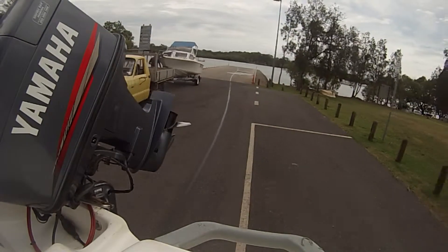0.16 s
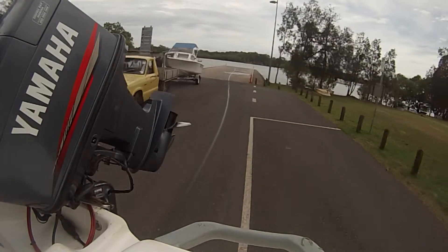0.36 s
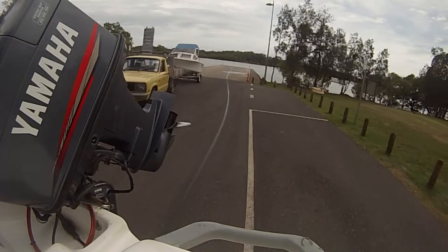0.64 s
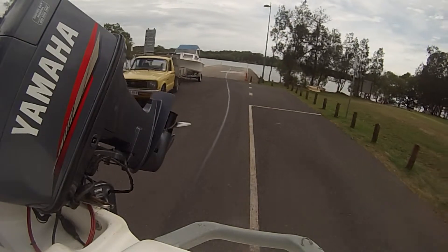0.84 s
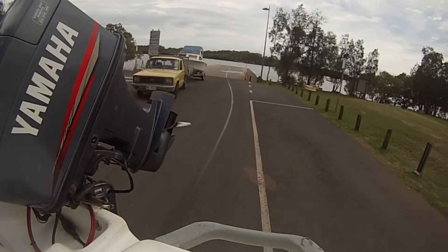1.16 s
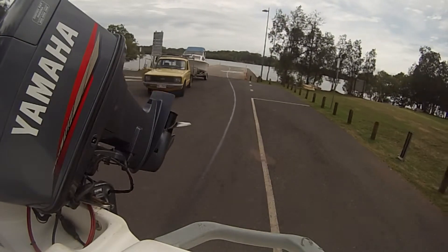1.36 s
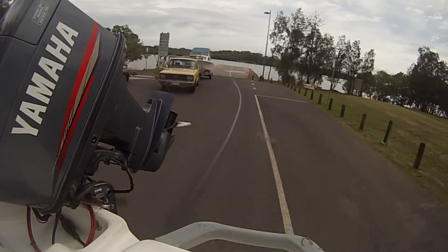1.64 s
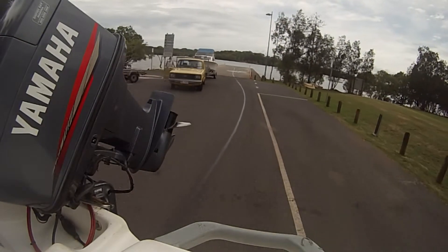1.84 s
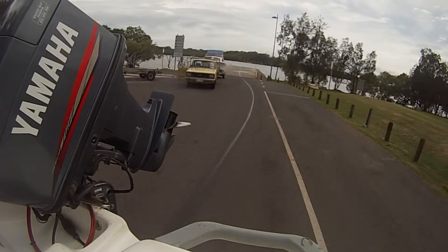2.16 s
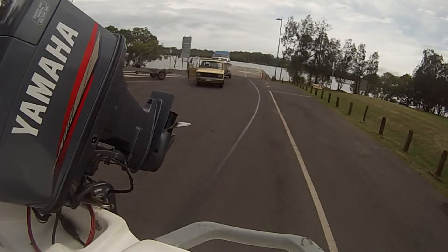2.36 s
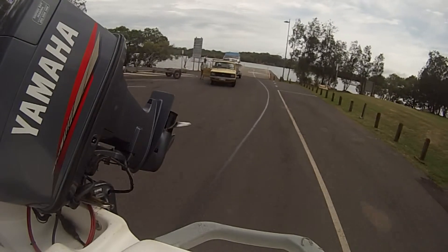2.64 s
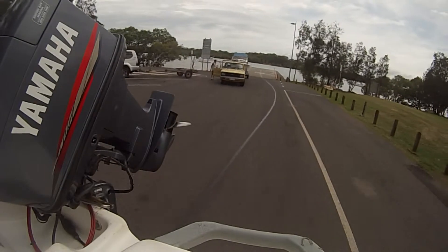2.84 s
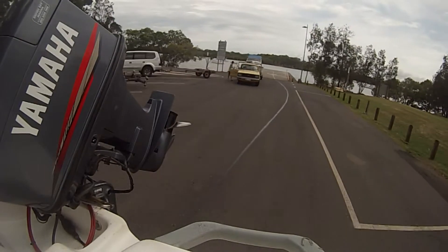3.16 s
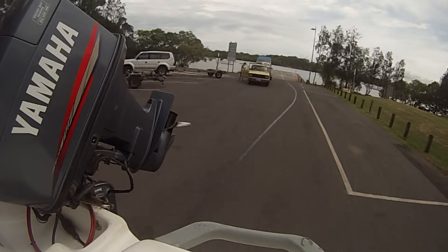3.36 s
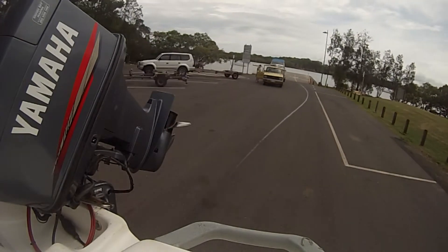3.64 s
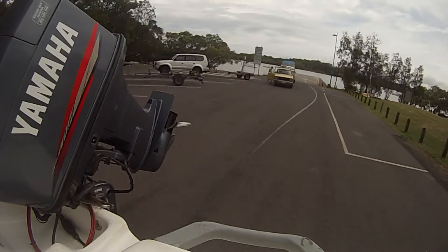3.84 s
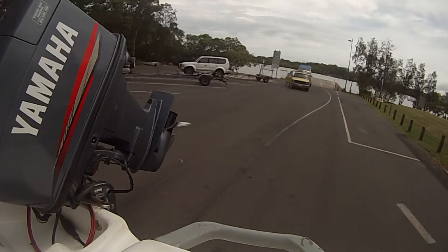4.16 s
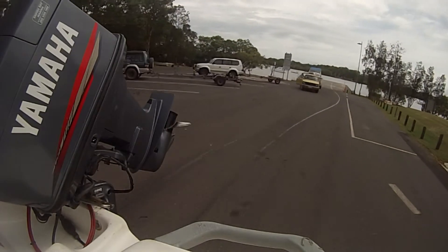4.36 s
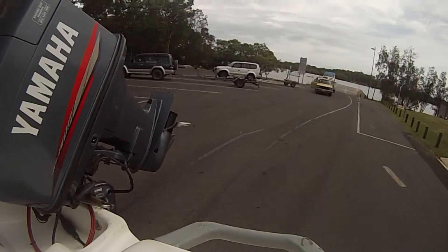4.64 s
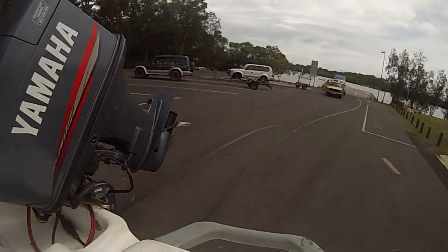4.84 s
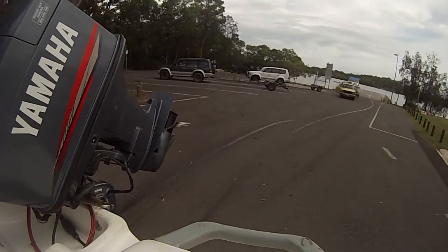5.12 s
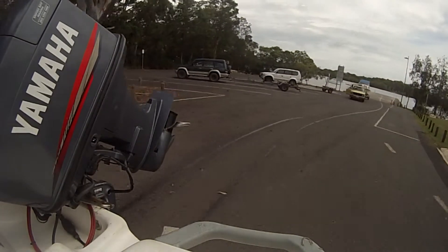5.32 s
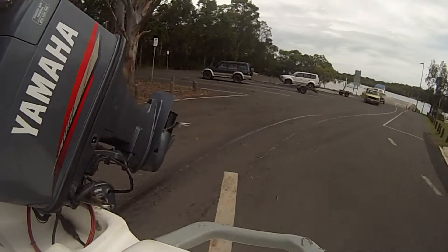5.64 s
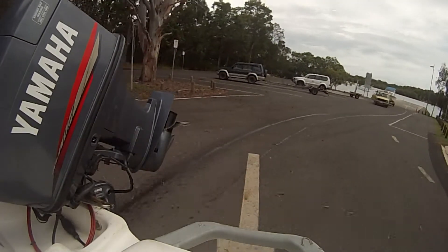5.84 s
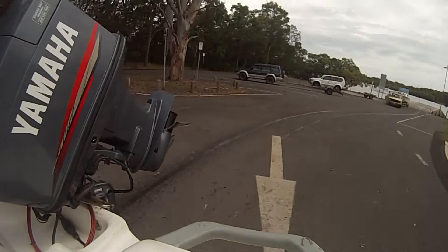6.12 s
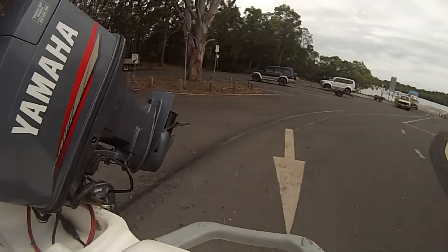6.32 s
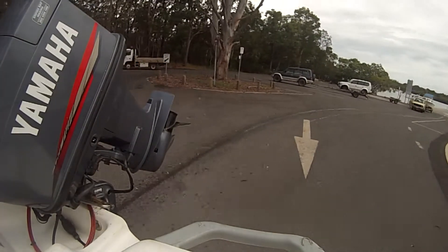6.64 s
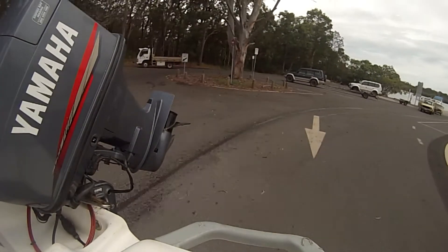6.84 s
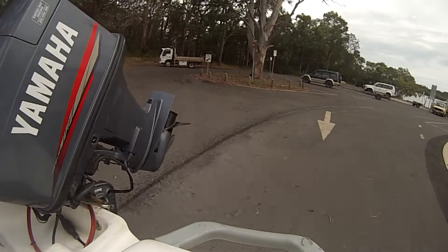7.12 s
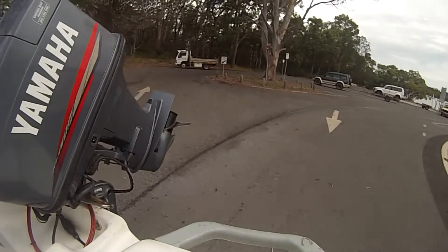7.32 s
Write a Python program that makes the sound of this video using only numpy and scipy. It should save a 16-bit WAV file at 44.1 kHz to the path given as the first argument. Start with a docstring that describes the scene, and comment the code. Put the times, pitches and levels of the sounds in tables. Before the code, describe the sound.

A trailer carries a boat along a paved road, the microphone close to the hull at the back. A low drone swells into soft booms above steady rumble and light tyre hiss. Scattered knocks and hollow bumps join in, along with barely audible birds. The ride gets rougher in the second half, with rattling panels, short stony crunches and deep thuds from the springs.

```python
"""On an asphalt road, at the stern of a boat that rides on its trailer.
The tyres force the hull into vibration: it drones at one low resonance, swells into booms and rattles
in its panels. On coarser pavement the rumble grows, stones crunch through the frame, the springs
thud and a loose fitting knocks. Faint birds chirp in the trees over an even hiss of air and tyres."""
import sys
import numpy as np
from scipy import signal
from scipy.fft import rfft, irfft
from scipy.io import wavfile
from scipy.ndimage import uniform_filter1d

SR = 44100
rng = np.random.default_rng(int(sys.argv[2]) if len(sys.argv) > 2 else 0)


def dump(signal):
    """Clip the signal to [-1, 1] and save it as 16-bit WAV at the path in sys.argv[1]."""
    limited = np.clip(np.atleast_2d(signal).T, -1, 1)
    pcm = np.round(limited * 32767).astype(np.int16)
    wavfile.write(sys.argv[1], SR, pcm)


N = 329868
TIME = np.arange(N) / SR
BINS = np.fft.rfftfreq(N, 1 / SR)

# Hiss of air and tyres. Each row: frequency in Hz, relative spectral density in dB.
HISS_SPECTRUM = [(150, 8), (400, 7), (650, 4), (950, 0), (1500, -1.5), (2100, -4), (4200, -9),
                 (7000, -14.5), (10000, -19.5), (13000, -23), (15500, -26)]
# Bird calls. Each row: start in seconds, length in seconds, first and last pitch in Hz,
# relative level in dB, rms pitch jitter in Hz.
BIRD_CALLS = [(2.918, .1, 5700, 6300, -79, 70), (3.447, 0.14, 4080, 4140, -76, 80),
              (3.486, .08, 3310, 4050, -72, 40), (3.70, 0.1, 6100, 6700, -77.5, 55),
              (3.702, 0.18, 5050, 5200, -80, 110), (3.79, 0.05, 3630, 3680, -75.5, 110),
              (4.115, 0.1, 6400, 6450, -76.5, 65), (4.964, .14, 5100, 6620, -75.5, 65),
              (5.485, 0.09, 5300, 6160, -78, 80), (5.584, 0.054, 3520, 3480, -75, 60),
              (6.26, 0.16, 4850, 5030, -81, 130), (6.308, 0.12, 4250, 4400, -74, 85),
              (6.52, 0.13, 4850, 4940, -75.5, 80), (6.517, 0.13, 3600, 4130, -73.5, 60),
              (6.97, .1, 3740, 4000, -77, 100), (7.085, 0.17, 4800, 5100, -81.5, 140)]
# Coarseness of the asphalt. Each row: time in seconds, relative level of shaking in dB.
ROAD_COARSENESS = [(0, -40.5), (1.0, -42), (2.8, -38), (3.7, -35), (5.1, -32.5), (5.75, -29.5), (7.15, -29),
                   (7.48, -35.5)]
# Rough patches. Each row: start in seconds, length in seconds, change of rumble and of rattle in dB.
ROUGH_PATCHES = [(3.792, 0.43, 2.5, 4.5), (4.587, 0.44, 0.5, 3), (5.507, 0.26, -2, 1.5),
                 (5.907, 0.24, 5, 8), (6.454, 0.51, 3, 4)]
# Deep tyre rumble. Each row: frequency in Hz, relative spectral density in dB.
RUMBLE_SPECTRUM = [(12, -5), (23, 7.5), (30, -3), (41, -6), (54, 1.5), (65, -9.5), (78, -6.5), (95, -7.5),
                   (130, -10.5), (165, -13.5), (200, -37.5), (400, -70.5), (2000, -110)]
# Dips in the road. Each row: start in seconds, peak level of the bounce in dB.
ROAD_DIPS = [(3.828, -22), (4.628, -22), (5.892, -20.5), (5.978, -22), (6.401, -15.5), (7.075, -21.5)]
# Jolts that flex the hull floor. Each row: start in seconds, relative level in dB.
FLOOR_JOLTS = [(4.124, -37), (6.86, -40), (7.07, -42), (7.383, -39)]
# Modes of the floor. Each row: frequency in Hz, relative level in dB, 60 dB decay time in seconds.
FLOOR_MODES = [(173, 5, 0.32), (206, -3.5, 0.24), (235, -8, .15)]
# Resonances of the hull panels. Each row: frequency in Hz, width in Hz, gain in dB.
PANEL_MODES = [(206, 35, 3.5), (226, 36, 4.5), (282, 5, -2), (343.8, 22.8, 13.5), (375, 14, 5.5),
               (490, 28, 1.5), (720, 50, 1.5), (900, 14, 9.5), (1126, 15, 9.5), (1190, 51, 2.5),
               (2400, 290, 1.5)]
# The stoniest stretches. Each row: start in seconds, length in seconds, level in dB.
STONY_STRETCHES = [(4.77, 0.15, -53.5), (5.505, 0.094, -51), (5.896, 0.091, -43.5), (6.007, 0.099, -45),
                   (6.536, 0.17, -50.5)]
# Transmission from stones through the trailer frame. Each row: frequency in Hz, relative gain in dB.
FRAME_RESPONSE = [(190, -16), (245, -0.5), (310, -0.5), (480, 1), (700, -6.5), (850, -14), (1150, -11.5),
                  (1500, -14), (1800, -22.5), (2600, -26), (5000, -45.5)]
# Blows of the loose fitting. Each row: start in seconds, relative strength in dB,
# spectral tilt in dB per two octaves, gain of the hull's thump in dB.
FITTING_BLOWS = [(2.141, -50, -2, -3), (3.372, -41.5, 1, -1), (3.654, -48, -6, 1), (3.908, -47, -1, 1),
                 (4.123, -45, -7, -7), (4.725, -43, -3, 0), (4.918, -49, -3, 0), (5.319, -43, -1, -6),
                 (5.7142, -31.5, -0.5, -1.5), (6.192, -36.5, 2, 2.5), (6.292, -43, 2, -10),
                 (6.467, -42.5, 0, -4), (6.609, -34.5, -2.5, -9), (6.745, -40, 0, 1), (6.902, -45, -2, 2),
                 (7.201, -40, -1, -3), (7.3904, -38.5, 1.5, 0)]
# Modes that the fitting excites. Each row: frequency in Hz, relative level in dB,
# 60 dB decay time in seconds, rise time in seconds.
FITTING_MODES = [(353, -7, 0.1, 0.0027), (453, -7.5, 0.075, 0.004), (650, -14.5, 0.055, 0.0048),
                 (692, -4.5, 0.058, 0.003), (1311, -12.5, 0.045, 0.003), (1416, -13.5, 0.03, 0.0027),
                 (1813, -15.5, 0.022, 0.003), (2390, -11, 0.02, 0.0027), (2550, -18, 0.019, 0.0018)]
# Transmission from the road into the hull. Each row: frequency in Hz, relative gain in dB.
ROAD_TO_HULL = [(90, -37), (155, 10.5), (185, 2), (255, -8), (300, -7.5), (420, -6), (560, -12.5),
                (720, -16.5), (810, -25.5), (1520, -20), (1750, -37), (2600, -33.5), (5000, -54.5),
                (12000, -72)]
# The hull's low resonance. Each row: frequency in Hz, relative gain in dB.
HULL_RESONANCE = [(70, -70.5), (100, -15.5), (113, -4.5), (121, 4), (133, -1), (146, -25.5), (200, -72.5)]
# The drone between swells. Each row: time in seconds, relative level in dB.
DRONE_LEVEL = [(0, -29), (1.8, -28), (2.5, -33), (3.3, -28.5), (4.5, -29.5), (5.4, -26), (7.48, -29.5)]
# The loudest swells of the hull's low drone, each one smooth boom.
# Each row: crest time in seconds, length in seconds, relative level in dB.
DRONE_SWELLS = [(0.061, 0.11, -22.5), (0.341, 0.16, -21.5), (0.568, 0.15, -21.5), (1.001, 0.058, -20.5),
                (1.336, 0.25, -23), (1.442, 0.12, -22.5), (1.731, .08, -23.5), (1.821, 0.096, -21),
                (2.048, 0.15, -25), (2.321, 0.2, -21), (2.738, 0.16, -20.5), (2.957, 0.31, -24),
                (3.308, 0.12, -24), (3.393, 0.11, -21.5), (5.469, 0.14, -17), (5.713, 0.11, -20),
                (6.027, 0.19, -19.5), (6.251, 0.21, -18.5), (6.491, 0.084, -17.5), (6.652, 0.17, -21),
                (6.899, 0.081, -18)]


def gain_of(db):
    """Amplitude ratio of a level in decibels."""
    return 10 ** (np.asarray(db) / 20)


def unit_rms(x):
    """Normalisation to an rms of 1."""
    return x / np.sqrt(np.mean(abs(x) ** 2) + 1e-20)


def response_db(points):
    """A frequency response in dB, interpolated on a logarithmic frequency axis."""
    hz, db = np.transpose(points)
    return np.interp(np.log(BINS + 1), np.log(hz), db)


def follow(points):
    """Linear interpolation of a level curve at every sample."""
    return np.interp(TIME, *np.transpose(points))


def add(mix, start_s, sound):
    """Superposition of a sound on the mix."""
    part = mix[round(start_s * SR):][:len(sound)]
    part += sound[:len(part)]


def colour(x, db):
    """Linear filtering by a response in dB, normalised to an rms of 1."""
    return unit_rms(irfft(rfft(x) * gain_of(db), N))


def low_pass(x, hz):
    """Steep attenuation above a cutoff frequency."""
    bins = np.fft.rfftfreq(2 * N, 1 / SR)
    return irfft(rfft(x, 2 * N) / (1 + (bins / hz) ** 8))[:N]


def wander(rate_hz):
    """A random fluctuation of rms 1, band-limited to about the given rate."""
    return unit_rms(irfft(rfft(rng.standard_normal(N)) / (1 + (BINS / rate_hz) ** 4), N))


def impacts(per_s):
    """Shot noise of rms 1: impulses of random size at independent times."""
    return unit_rms(rng.standard_normal(N) * (rng.random(N) < per_s / SR))


def hiss(level_db=-57.5, flutter_db=0.74):
    """Broadband noise: air and tyres hiss at a nearly constant level."""
    envelope = gain_of(level_db + flutter_db * wander(rate_hz=30))
    return envelope * colour(rng.standard_normal(N), response_db(HISS_SPECTRUM))


def birds(gain_db=0.5, flutter_db=3, echo_db=-4, echo_t60_s=1.2):
    """Frequency and amplitude modulation roughen thin, mostly rising whistles; the trees reverberate."""
    calls = np.zeros(N)
    jitter = wander(rate_hz=250)
    flutter = gain_of(flutter_db * wander(rate_hz=70))
    for start, length, first_hz, last_hz, db, jitter_hz in BIRD_CALLS:
        size = int(length * SR)
        span = round(start * SR) + np.arange(size)
        hz = np.linspace(first_hz, last_hz, size) + jitter_hz * jitter[span]
        whistle = np.sin(2 * np.pi * np.cumsum(hz) / SR) * flutter[span] * signal.windows.tukey(size, .5)
        add(calls, start, gain_of(db) * unit_rms(whistle))
    t = np.arange(SR // 2) / SR
    trees = rng.standard_normal(len(t)) * gain_of(-60 * t / echo_t60_s)
    echo = signal.fftconvolve(calls, trees / np.linalg.norm(trees))[:N]
    return gain_of(gain_db) * (calls + gain_of(echo_db) * echo)


def road_excitation(roll_on_s=0.022):
    """Surface roughness drives the tyres: two curves in dB, one for the rumble and one for the rattle."""
    db = follow(ROAD_COARSENESS)
    for start, length, *change_db in ROUGH_PATCHES:
        inside_s = np.minimum(TIME - start, start + length - TIME)
        on_patch = np.clip(.5 + inside_s / roll_on_s, 0, 1)
        db = db + np.outer(change_db, on_patch)
    return db


def tyre_rumble(gain_db=1.06, sway_db=-46, sway_hz=21):
    """Random forcing: the rumble follows the road, over a steady narrow-band sway on the springs."""
    tyres = colour(rng.standard_normal(N), response_db(RUMBLE_SPECTRUM))
    sway = unit_rms(wander(rate_hz=10) * np.sin(2 * np.pi * sway_hz * TIME))
    road_db, _ = road_excitation()
    return gain_of(road_db + gain_db) * tyres + gain_of(sway_db) * sway


def spring_thuds(spring_hz=33, rise_s=0.029, detune=0.053):
    """A damped mass on a spring: each dip sets the trailer bouncing for a few deep cycles."""
    t, out = np.arange(SR // 4) / SR, np.zeros(N)
    envelope = (t / rise_s) ** 2 * np.exp(2 * (1 - t / rise_s))
    for start, db in ROAD_DIPS:
        hz = spring_hz * (1 + detune * rng.standard_normal())
        add(out, start, gain_of(db) * envelope * np.sin(2 * np.pi * hz * t))
    return out


def floor_flexes(rise_s=0.017):
    """Free vibration: after a sharp jolt the modes of the hull floor decay in a soft, hollow bump."""
    hz, mode_db, t60 = np.transpose(FLOOR_MODES)[:, :, None]
    t, out = np.arange(SR // 4) / SR, np.zeros(N)
    onset = 1 - np.exp(-(t / rise_s) ** 2)
    for start, jolt_db in FLOOR_JOLTS:
        decay = gain_of(jolt_db + mode_db - 60 * t / t60)
        modes = np.sin(2 * np.pi * (hz * t + rng.random(hz.shape)))
        add(out, start, onset * (decay * modes).sum(0))
    return out


def panel_resonance_db():
    """Resonance: each panel mode adds a bell-shaped curve in dB to the response."""
    return sum(db / (1 + (2 * (BINS - hz) / width) ** 2) for hz, width, db in PANEL_MODES)


def stone_crunches(grains_per_s=450, noise_ratio=0.55, taper=0.44, ringing=0.96):
    """Structure-borne sound: surges of stone impacts travel through the frame and ring the panels."""
    force = impacts(grains_per_s) + noise_ratio * rng.standard_normal(N)
    vibration = colour(force, response_db(FRAME_RESPONSE) + ringing * panel_resonance_db())
    out = np.zeros(N)
    for start, length, db in STONY_STRETCHES:
        surge = vibration[round(start * SR):][:int(length * SR)]
        add(out, start, gain_of(db) * unit_rms(surge) * signal.windows.tukey(len(surge), taper))
    return out


def fitting_knocks(gain_db=2.5, detune=0.008, contact_cycles=4.6, pivot_hz=700, thump_below_hz=550):
    """Impact excitation: modes swell, hold while the fitting chatters on its stop, then decay fast."""
    hz, mode_db, t60, rise_s = np.transpose(FITTING_MODES)[:, :, None]
    t, out = np.arange(SR // 8) / SR, np.zeros(N)
    onset = 1 - np.exp(-(t / rise_s) ** 2)
    free_s = np.maximum(t - contact_cycles / hz, 0)
    for start, strength_db, tilt_db, thump_db in FITTING_BLOWS:
        pitch = hz * (1 + detune * rng.standard_normal(hz.shape))
        timbre_db = tilt_db * np.log2(hz / pivot_hz) / 2 + thump_db * (hz < thump_below_hz)
        envelope = onset * gain_of(strength_db + mode_db + timbre_db - 60 * free_s / t60)
        add(out, start, (envelope * np.sin(2 * np.pi * pitch * t)).sum(0))
    return gain_of(gain_db) * out


def panel_rattle(jolts_per_s=700, noise_ratio=1.17, rest_db=-55.5, bright_from_db=-48, split_hz=800):
    """Forced vibration: stones in the asphalt ring the hull panels; harder shaking is brighter."""
    _, road_db = road_excitation()
    above_smooth_db = road_db + 42  # smooth asphalt shakes at -42 dB
    driven_db = -58 + 0.94 * above_smooth_db
    level_db = 20 * np.log10(np.hypot(gain_of(rest_db), gain_of(driven_db)))  # the powers add
    force = impacts(jolts_per_s) + noise_ratio * rng.standard_normal(N)
    force *= gain_of(1.1 * wander(rate_hz=7.9))
    vibration = colour(force, response_db(ROAD_TO_HULL) + panel_resonance_db())
    low = low_pass(vibration, split_hz)
    treble_gain = gain_of(0.26 * np.minimum(level_db - bright_from_db, 0))
    return gain_of(level_db) * (low + treble_gain * (vibration - low))


def hull_drone(ring_hz=122, width_hz=50, detune=0.012, throb_db=2.2, drone_gain_db=-3, boom_gain_db=-2.5):
    """Resonance under random forcing: the hull throbs, and its loudest swells are smooth booms."""
    ring = signal.hilbert(colour(rng.standard_normal(N), response_db(HULL_RESONANCE)))
    power = uniform_filter1d(abs(ring) ** 2, int(0.067 * SR))
    beating = unit_rms(ring.real / np.sqrt(power + 0.045))  # slow beats even out, quick ones stay
    hull = gain_of(follow(DRONE_LEVEL) + throb_db * wander(rate_hz=15) + drone_gain_db) * beating
    for crest, length, db in DRONE_SWELLS:
        crossfade = np.cos(np.pi * np.clip((TIME - crest) / length, -.5, .5)) ** 2
        hz = ring_hz * (1 + detune * rng.standard_normal())
        boom = np.sqrt(2) * gain_of(db + boom_gain_db) * np.sin(2 * np.pi * (hz * TIME + rng.random()))
        hull += crossfade * (boom - hull)
    passband = 1 / (1 + (2 * (BINS - ring_hz) / width_hz) ** 6)  # a narrow resonance changes slowly
    return irfft(rfft(hull) * passband, N)


def scene():
    """Superposition of all sources at the stern, in one channel."""
    mix = hull_drone() + tyre_rumble() + spring_thuds() + panel_rattle() + hiss()
    return (mix + fitting_knocks() + birds() + stone_crunches() + floor_flexes())[None]


def record(dry, cutoff_hz=15300):
    """Band limiting: a linear-phase low-pass removes the highest treble."""
    taps = signal.firwin(511, cutoff_hz, window=("kaiser", 9), fs=SR)
    return signal.oaconvolve(dry, taps[None], "same")


dry = scene()
out = record(dry)
dump(out)
```